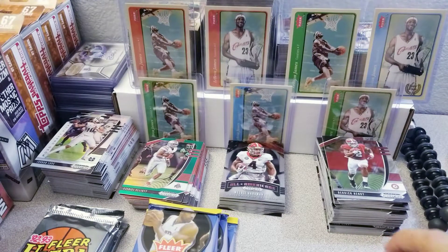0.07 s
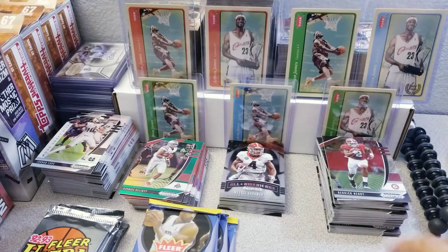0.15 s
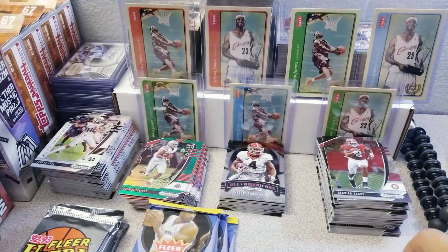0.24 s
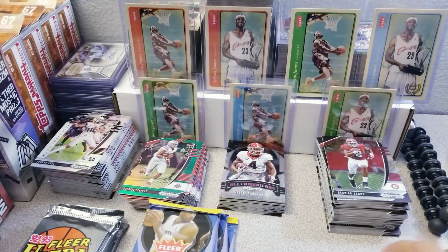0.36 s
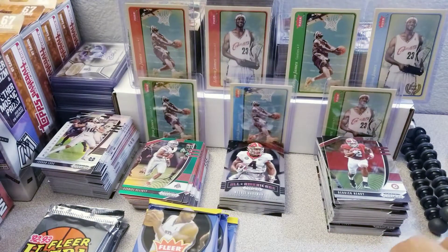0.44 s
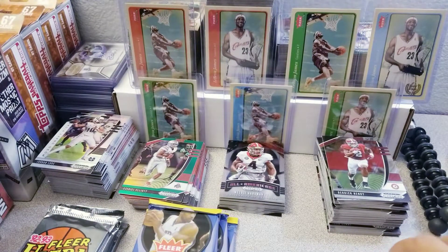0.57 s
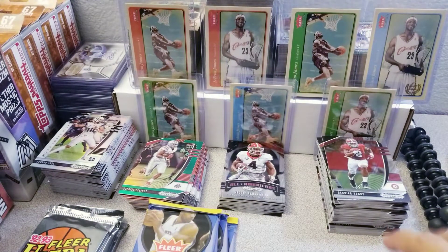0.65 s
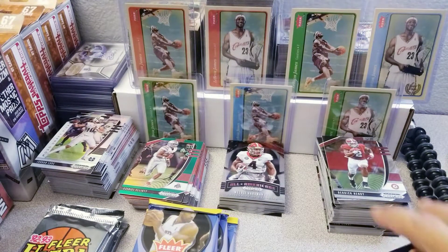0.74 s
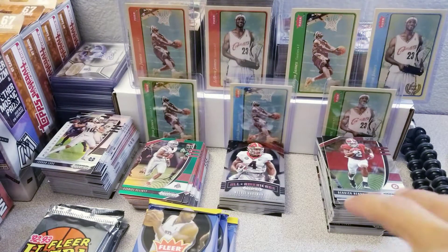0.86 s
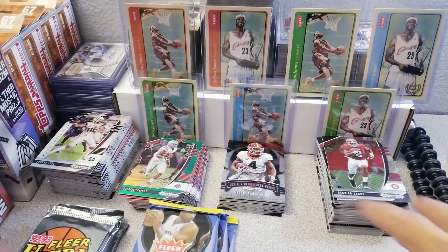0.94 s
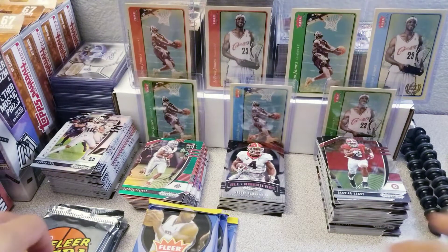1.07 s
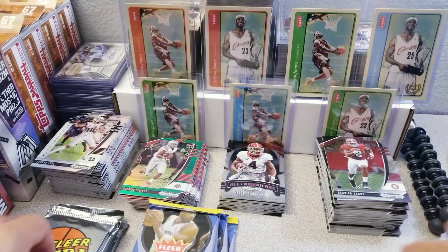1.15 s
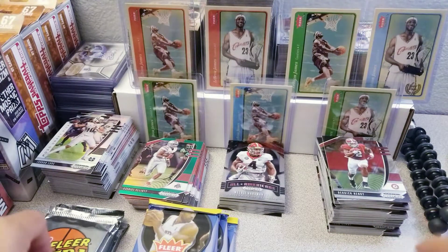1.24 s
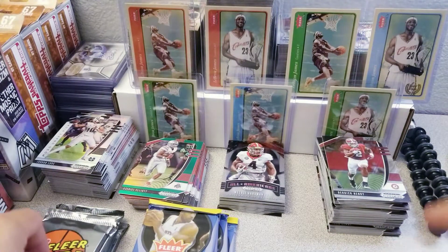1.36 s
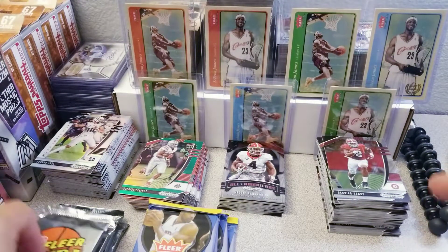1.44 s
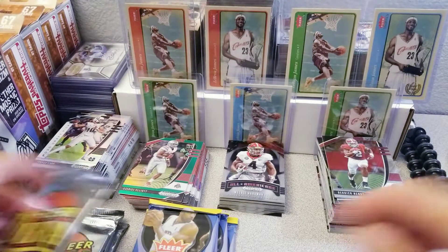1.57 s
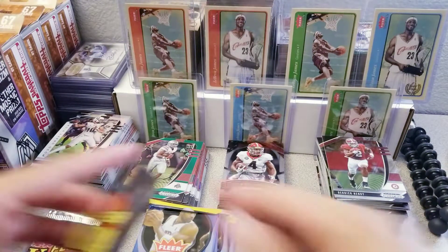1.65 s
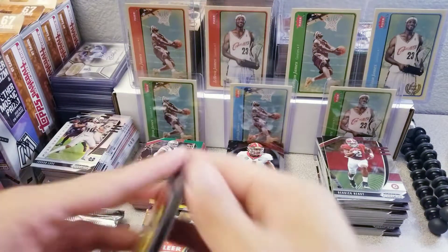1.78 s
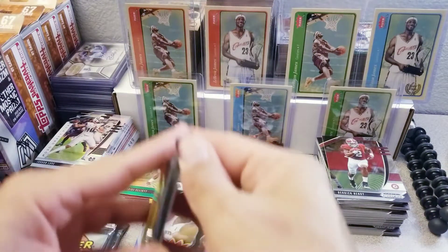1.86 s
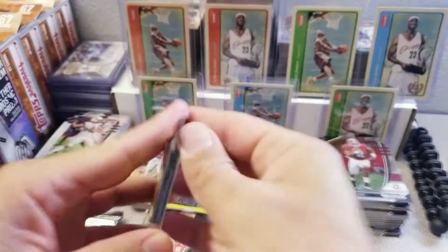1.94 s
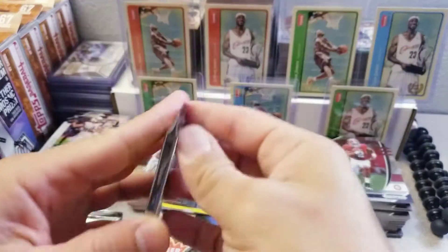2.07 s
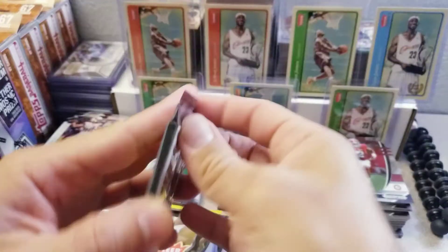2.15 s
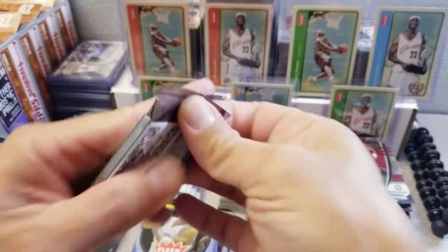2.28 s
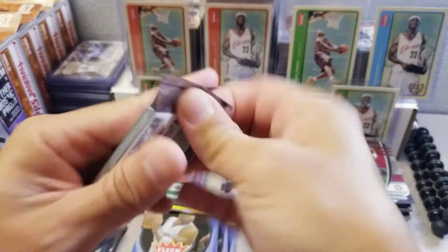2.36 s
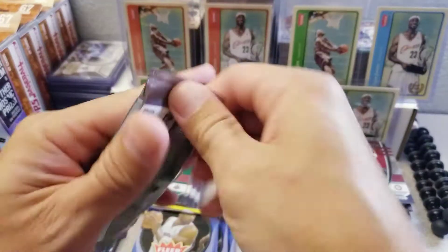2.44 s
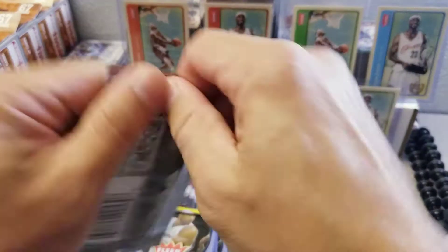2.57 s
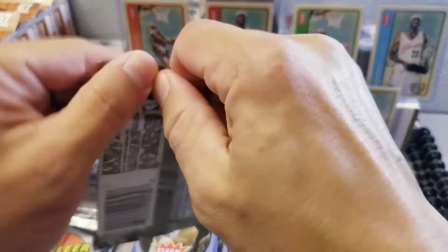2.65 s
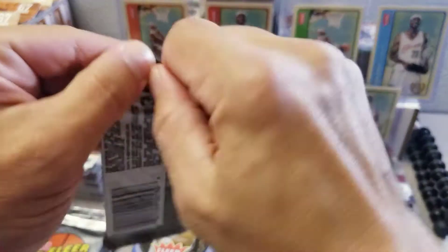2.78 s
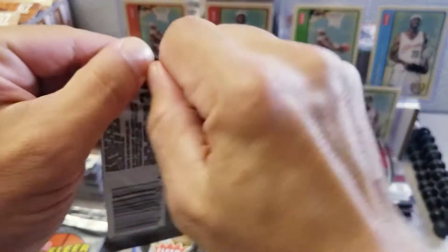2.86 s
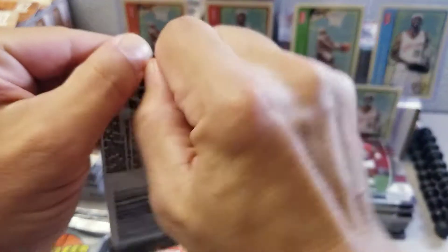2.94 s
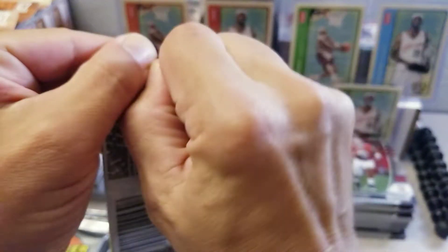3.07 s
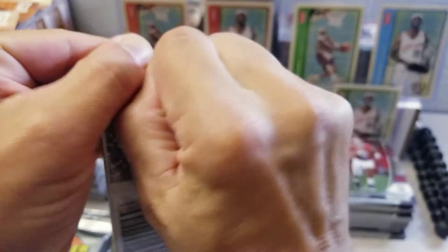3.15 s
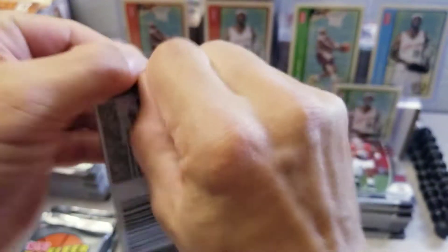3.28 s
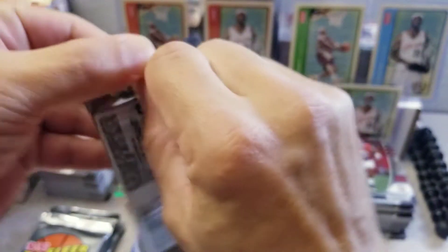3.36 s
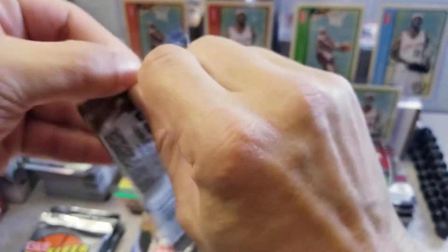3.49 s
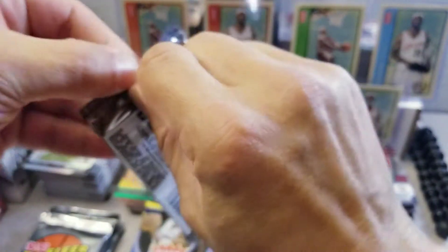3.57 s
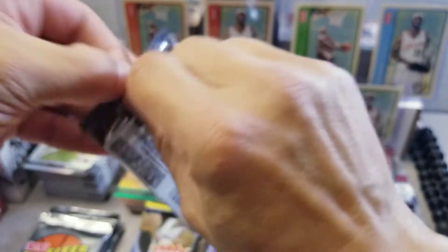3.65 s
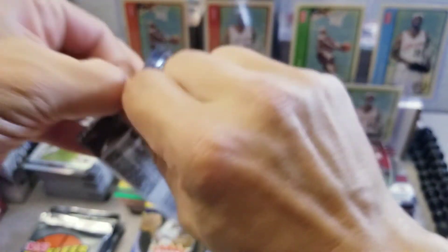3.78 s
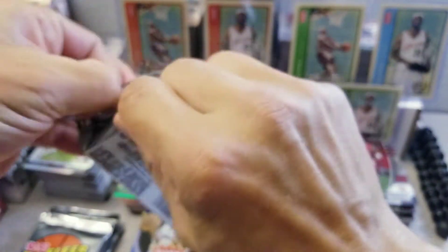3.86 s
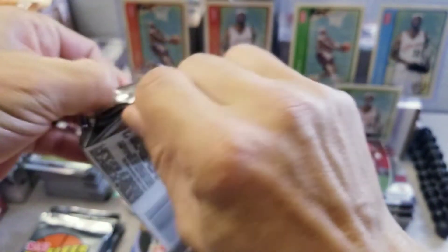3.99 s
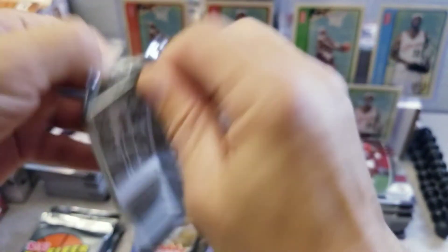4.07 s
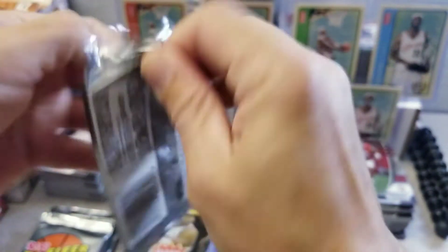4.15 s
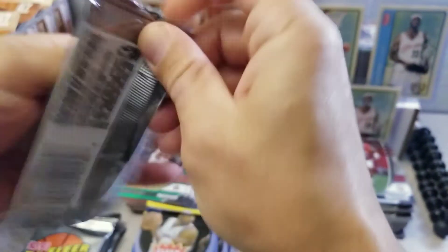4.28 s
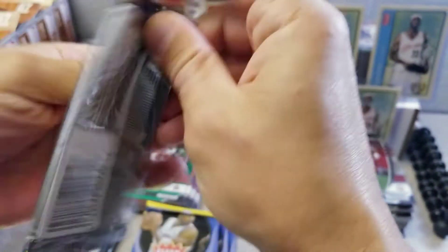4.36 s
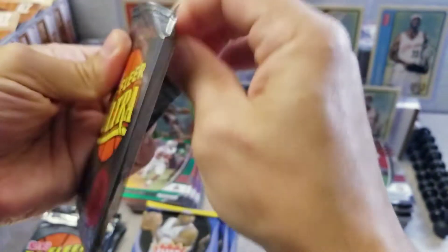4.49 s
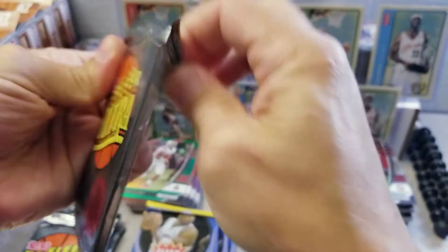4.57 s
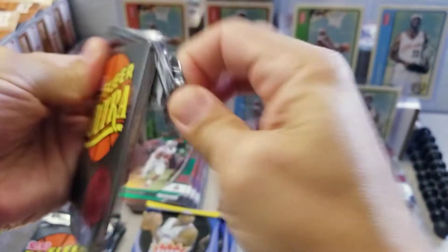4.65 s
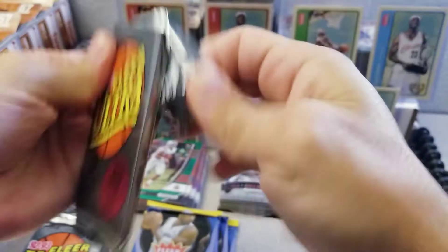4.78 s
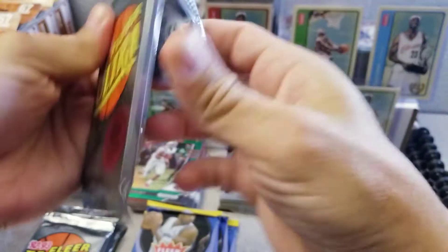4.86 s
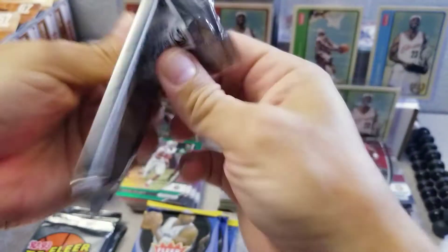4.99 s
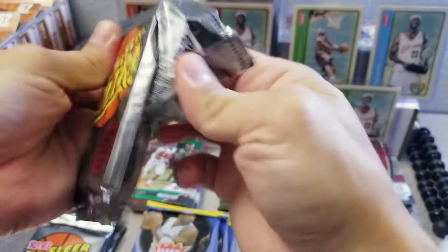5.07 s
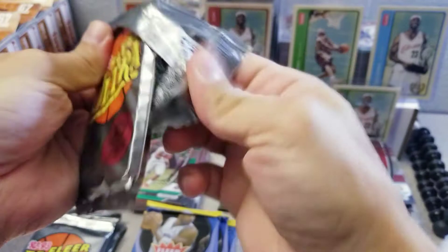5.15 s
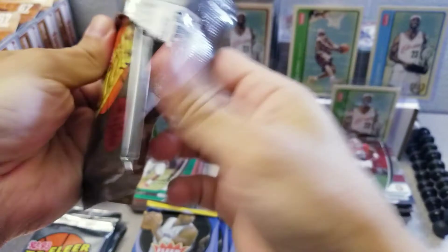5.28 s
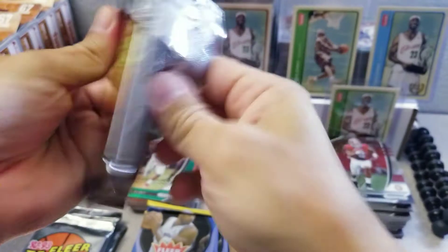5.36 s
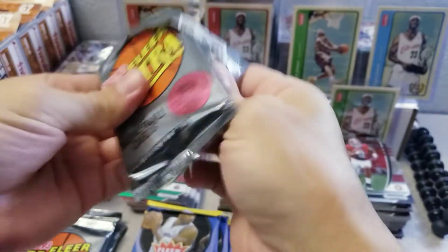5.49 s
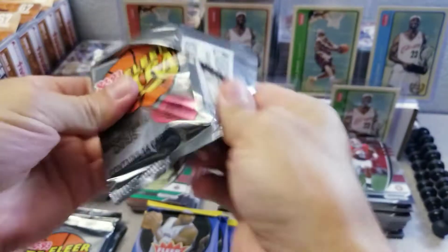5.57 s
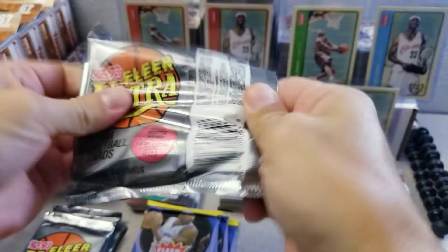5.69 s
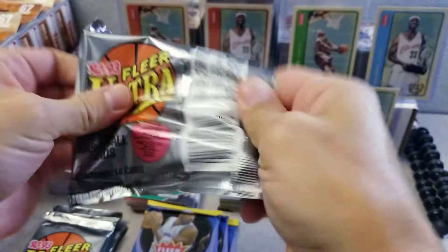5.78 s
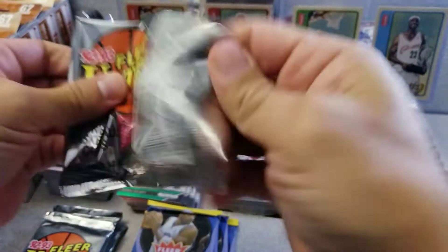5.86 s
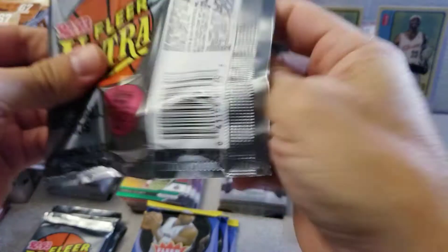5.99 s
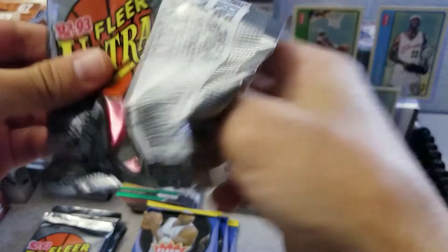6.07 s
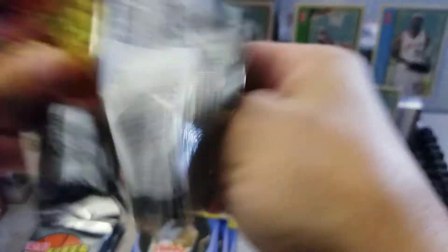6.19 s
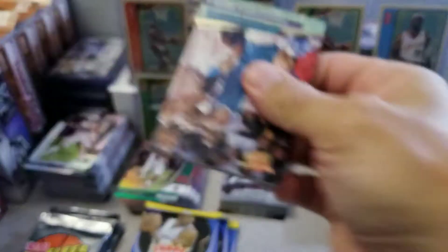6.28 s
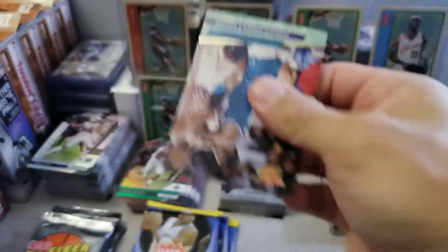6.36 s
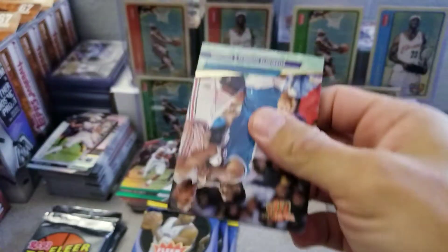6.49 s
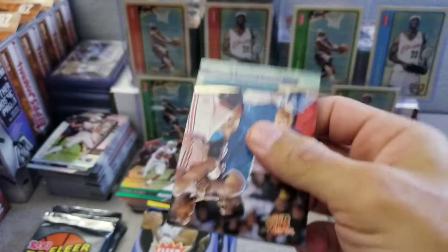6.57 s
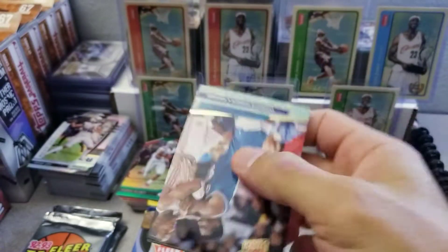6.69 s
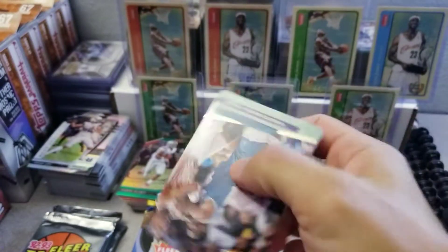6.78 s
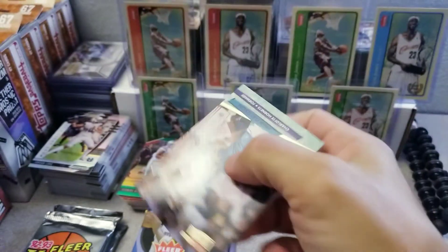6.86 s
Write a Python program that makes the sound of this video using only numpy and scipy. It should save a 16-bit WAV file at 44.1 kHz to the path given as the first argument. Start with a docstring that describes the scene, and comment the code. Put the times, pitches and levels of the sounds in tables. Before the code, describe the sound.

Near-silent hum, a tiny squeak, then bright foil crinkles and snaps build to a ripping seam and a papery card slide.

```python
"""Close to the microphone in a small, humming room, two hands pick up a foil pack of trading cards.
It starts with faint crackle from many tiny buckling wrinkles; the pack slides off its pile with a squeak and whistle.
Then creases snap one by one, each a spike with a short ring, over crackle that follows the flexing of the foil.
Late on the seam peels in a burst of friction and quick slips, and the air in the open pouch rings hollow.
At the end the cards slide against each other as filtered noise. Soft finger knocks are scattered throughout."""
import sys
import numpy as np
from scipy import signal
from scipy.fft import rfft, irfft, next_fast_len
from scipy.io import wavfile
from scipy.ndimage import uniform_filter1d, map_coordinates

SR = 44100
rng = np.random.default_rng(int(sys.argv[2]) if len(sys.argv) > 2 else 0)


def transcribe(signal):
    """Save signal, clipped to [-1, 1], as a 16-bit WAV file at the path in sys.argv[1]."""
    frames = np.atleast_2d(signal).T
    limited = np.clip(frames, -1, 1)
    pcm = np.round(limited * 32767).astype(np.int16)
    wavfile.write(sys.argv[1], SR, pcm)


N = 305613   # length in samples
TIME = np.arange(N) / SR   # seconds


def from_db(db):
    """Turn decibels into a gain."""
    return 10 ** (np.asarray(db) / 20)


def rms_one(x):
    """Scale a sound to an rms (average strength) of one."""
    return x / np.sqrt(np.mean(x ** 2) + 1e-20)


def in_time(rows):
    """Draw straight lines between the rows: each column of a curve, at every sample."""
    s, *columns = np.transpose(rows)
    return [np.interp(TIME, s, column) for column in columns]


def at_hz(points, hz):
    """Read a spectrum between its points on a log-frequency axis."""
    f, value = np.transpose(points)
    return np.interp(np.log(hz + 1), np.log(f), value)


def colour(x, points):
    """Give a sound a smooth spectrum by scaling its frequencies."""
    size = next_fast_len(N + SR // 10)
    hz = np.arange(size // 2 + 1) * SR / size
    return irfft(rfft(x, size) * from_db(at_hz(points, hz)), size)[..., :N]


def band(x, low_hz, high_hz, order=3):
    """Keep only the pitches between two edges."""
    edges = [low_hz, min(high_hz, .45 * SR)]
    return signal.sosfilt(signal.butter(order, edges, "band", fs=SR, output="sos"), x + 1e-18)


def resonate(x, modes):
    """Ring a body at several pitches side by side; a narrower resonance rings longer."""
    out = 0
    for hz, width_hz, db in modes:
        r = np.exp(-np.pi * width_hz / SR)
        poles = [1, -2 * r * np.cos(2 * np.pi * hz / SR), r * r]
        out = out + from_db(db) * signal.lfilter([1 - r, 0, r - 1], poles, x)
    return out


def pair(likeness, size=N):
    """Left and right noise; likeness is the share of power they have in common, 0 to 1."""
    common, left, right = rng.standard_normal((3, size))
    share = np.clip(likeness, 0, 1)
    return np.sqrt(share) * common + np.sqrt(1 - share) * np.array([left, right])


def stick_slip(curve, overtones_db, jitter):
    """A surface catches and slips at an unsteady rate, which makes a wavering tone with overtones."""
    hz, level_db = in_time(curve)
    wobble = rms_one(band(rng.standard_normal(N), 30, 550, order=1))
    phase = 2 * np.pi * np.cumsum(hz * (1 + jitter * wobble)) / SR
    tone = sum(from_db(db) * np.sin((k + 1) * phase) for k, db in enumerate(overtones_db))
    sounding = (TIME > curve[0][0]) * (TIME < curve[-1][0])
    return rms_one(tone) * from_db(level_db) * sounding


def rubbing(curve, modes, likeness):
    """Friction is noise that sounds the resonances of the body being rubbed."""
    return from_db(in_time(curve)[0]) * rms_one(resonate(pair(likeness), modes))


# Overall colour of the foil sheet. Each row: pitch in Hz, gain in dB.
FOIL_COLOUR = [(200, 6), (380, -7), (800, -6), (1300, -6), (2400, 1), (4100, 0.5), (5500, 3.5), (8000, 1.5),
               (11500, 5), (15500, -2.5)]
# Where the pack is held. Each row: time in seconds, average delay of the left ear in seconds.
PLACE = [(0, .00013), (3.7, .00003), (5.3, .00008), (5.9, .00005), (6.2, -.00006)]
# A small, tightly pinched patch of foil has little bass; a loose sheet has all of it.
# Each row: time in seconds, bass gain in dB.
SLACK = [(0, -0.5), (1.9, -9), (2.35, -1), (2.5, -8.5), (3.6, -7), (3.8, -16), (4.1, -5), (6.9, 1.5)]
# Air in the pouch rings. Each row: pitch in Hz, width in Hz, gain in dB before any overall pouch gain.
POUCH = [(355, 150, 8), (548.4, 10, 13), (628, 10, 11), (1616, 27, 5.5), (3510, 230, 1.5)]
# The sheet rings on a little. Each row: pitch in Hz, width in Hz, gain in dB.
SHEET_MODES = [(3356, 47, -5), (3963, 80, -2), (4550, 42, -15.5)]


def foil(scatter_s=.00004, creases_per_s=60, pouch_db=-13.0, low_cut_hz=265, bass_edge_hz=800):
    """Snaps and crackle ring in sheet and pouch, from all over the sheet, so the ear delay jumps about."""
    sheet = crackle() + sum(snaps(k) for k in range(len(REGISTERS)))
    sheet = band(colour(sheet, FOIL_COLOUR), low_cut_hz, SR / 2, order=2)
    bass = signal.sosfiltfilt(signal.butter(3, bass_edge_hz, fs=SR, output="sos"), sheet)
    sheet = sheet + (from_db(in_time(SLACK)[0]) - 1) * bass
    hollow = from_db(pouch_db) * resonate(sheet, POUCH)
    left, right = sheet + hollow + resonate(sheet, SHEET_MODES)
    # A new random spot on the sheet is used for each step, smoothed into the next.
    spot = rng.standard_normal(N)[(TIME * creases_per_s).astype(int)]
    delay_s = in_time(PLACE)[0] + scatter_s * uniform_filter1d(spot, size=200)
    left = map_coordinates(left, [np.arange(N) - delay_s * SR], order=5)
    return np.array([left, right * from_db(0.2)])


# Creases snapping through. Each row: time in seconds, crack level in dB before trim and foil filters,
# body and sizzle in dB relative to the crack, ring pitch of the facet in Hz, left over right in dB.
SNAPS = [(1.109, -48.5, -20, -16, 2400, 4), (1.6982, -34.5, -17, 7.5, 1900, -1),
         (1.711, -36.5, -9, 0, 1850, 0), (1.769, -39, -12, -0.5, 1850, -1),
         (1.907, -33, -13.5, 8.5, 3300, 0.5), (1.9391, -26, -20, -3.5, 1810, 1.5),
         (1.949, -28.5, -8.5, 1, 4820, 1.5), (2.077, -42, -34, 2.5, 4050, -5),
         (2.136, -31, -32, 7, 4600, 1), (2.1782, -22, -28, -7.5, 4110, -9),
         (2.2753, -25.5, -16, -6.5, 1360, -1), (2.3574, -29, -12, -2, 3700, -1),
         (2.435, -48, -20, 12, 4690, -1), (2.46, -26.5, -24, 0, 3530, -1),
         (2.5321, -28.5, -14, -5, 3900, 1), (2.551, -31, -4.5, -2, 1320, -1.5),
         (2.606, -37, -15, 10.5, 4950, -3), (2.629, -32, -22, 2.5, 3900, 4),
         (2.634, -32.5, -27, 3.5, 4500, -4), (2.7028, -39, -23, 6, 2430, 0),
         (2.763, -35, -20, -10, 3980, 3), (2.7146, -25, -38, -1, 4110, 0),
         (2.7497, -37.5, -10, 13, 4130, -6), (2.8003, -18.5, -22.5, -3.5, 4400, -1.5),
         (2.8766, -31, -38, 0.5, 4230, -1), (2.893, -35, -3, -6, 1280, 1),
         (2.9032, -34.5, -18, 4, 2560, -2), (2.992, -51, -29, 17, 4480, -2),
         (3.118, -55, -11, 18, 4800, 0.5), (3.2149, -44, -38, 14.5, 4070, -1),
         (3.245, -36, -12.5, 0.5, 4070, 0.5), (3.304, -25.5, -24, -2.5, 2330, -1),
         (3.353, -48.5, -29.5, 17, 2240, 1.5), (3.428, -36, -28, -10, 2330, -3.5),
         (3.4734, -42, -26, -5, 3360, 3), (3.6385, -41, -35.5, 4.5, 3380, -1),
         (3.79, -29.5, -9, 13.5, 4590, 3), (3.8296, -29, -4.5, 12, 3940, -2),
         (3.9325, -25.5, -15.5, 0, 3940, 0.5), (4.0399, -23.5, -20, -5, 4160, -2),
         (4.071, -27.5, -23.5, 5, 4070, -3), (4.085, -27.5, -12, -3, 4090, -1),
         (4.1051, -26.5, -23.5, -2, 4050, 1), (4.1132, -32, -8, 2, 1160, -3.5),
         (4.1675, -32, -13, -13, 2370, -2), (4.2542, -16, -15.5, -2.5, 2920, 2),
         (4.3184, -34.5, -3, 3.5, 1110, 0.5), (4.376, -35, -5, -2, 3450, -3),
         (4.3843, -29, -24, 7.5, 2400, -3.5), (4.3927, -24.5, -15, -5, 3880, -0.5),
         (4.4231, -27, -6.5, 3.5, 1520, -3.5), (4.4305, -26.5, -17, -8.5, 3340, 1.5),
         (4.4373, -27, -18, -12.5, 3900, -1), (4.4938, -22.5, -16.5, 5, 2890, -4.5),
         (4.5202, -15.5, -19.5, -11.5, 3320, 0.5), (4.5283, -19, -20.5, -12.5, 2390, -0.5),
         (4.5765, -19, -16, -12.5, 3820, 1), (4.7529, -29.5, -11, -3, 1570, -0.5),
         (4.7854, -29, -10.5, -21.5, 4330, 0.5), (4.8012, -28.5, -12, -4.5, 3700, 0),
         (4.886, -30.5, -27.5, -5.5, 3420, -1), (5.027, -24.5, -8, 5, 3900, -1),
         (5.0876, -22.5, 0.5, 12.5, 2350, 1), (5.156, -32, -14, 6, 2300, 1),
         (5.1775, -22, -23, 1, 1100, -1), (5.1977, -30, -16.5, -0.5, 1210, -0.5),
         (5.2618, -27.5, -16.5, 6.5, 4460, -3.5), (5.2975, -21.5, -37.5, -2.5, 3420, -1),
         (5.4121, -30, -4, -11.5, 1850, -1), (5.477, -35, -12, 8.5, 3320, 0),
         (5.4953, -34.5, -10.5, 9.5, 4390, -1), (5.542, -35.5, -14, 9, 3960, -5),
         (5.562, -30, -1.5, 2, 1230, 0), (5.5734, -27, -23, 10, 3360, -2.5),
         (5.5952, -25.5, -0.5, 5.5, 1770, 1), (5.673, -20.5, -8, -5, 1990, -3.5),
         (5.7496, -25.5, -8.5, -5.5, 3420, -1), (5.952, -31.5, -10.5, -2.5, 3980, 3.5),
         (5.962, -33.5, -14, 1.5, 4070, -4), (6.0588, -25, -10.5, 0.5, 3640, 4),
         (6.1789, -36.5, -29, 5.5, 4890, -2), (6.246, -45.5, -13, 7, 2370, 3),
         (6.283, -37, -10.5, 7, 4520, 16), (6.3023, -40, -5.5, 6, 3210, 6), (6.45, -40, -34, 4, 4610, 3)]
# The foil's three registers: body, crack and sizzle. Each row: lowest Hz, highest Hz,
# typical decay in seconds, left-right likeness from 0 to 1, snap trim in dB, crackle trim in dB.
REGISTERS = [(270, 1405, 0.0005, 0.94, 3.5, 3), (1120, 5440, 0.0016, 0.55, -2, -0.5),
             (4890, 15030, 0.0017, 0.79, -1.5, -3.5)]
FACET_HZ = 3860   # pitch of a typical facet


def snaps(register, flutter_db=-23, flutter_s=0.011, stiffness_spread=.2, spike_share=1.4, spike_s=0.000092,
          facet_width_hz=560, facet_db=6, facet_fall_db=-7, lead_s=.002, lead_db=-17):
    """Each crease gives a little, spikes, rings at its facet's pitch and flutters; low facets ring more."""
    low_hz, high_hz, decay_s, likeness, trim_db, _ = REGISTERS[register]
    t = np.arange(SR // 30) / SR - lead_s
    after = np.maximum(t, 0)
    # Stiff creases ring longer.
    ring_s = decay_s * np.exp(stiffness_spread * rng.standard_normal((len(SNAPS), 1, 1)))
    ring = np.exp(-after / ring_s)
    flutter = from_db(flutter_db) * np.exp(-after / flutter_s)
    spike = spike_share * np.exp(-after / spike_s)
    shape = np.where(t < 0, from_db(lead_db), ring + flutter + spike)
    noise = np.array([pair(likeness, size=len(t)) for row in SNAPS])
    bursts = band(noise * shape, low_hz, high_hz)
    out = np.zeros((2, N + len(t)))
    for (s, db, body_db, sizzle_db, ring_hz, pan_db), burst in zip(SNAPS, bursts):
        level_db = db + (body_db, 0, sizzle_db)[register] + trim_db
        facet_gain_db = facet_db + facet_fall_db * np.log2(ring_hz / FACET_HZ)   # fall per octave
        burst = burst + resonate(burst, [(ring_hz, facet_width_hz, facet_gain_db)])
        strength = np.sqrt(np.sum(burst ** 2, axis=1, keepdims=True) / (.004 * SR))   # as if spread over 4 ms
        ears = rms_one(from_db(np.array([[pan_db], [-pan_db]]) / 2))
        at = int((s - lead_s) * SR)
        out[:, at:at + len(t)] += burst / strength * ears * from_db(level_db)
    return out[:, :N]


def crackle(per_s=380, typical_flex_db=-35, crowding=.95, spread_db=4.0, even_s=0.045, colour_db=4.5,
            pan_db=1.0, rub_share=.1, soft_db=-57, count=4):
    """Tiny wrinkles buckle at random and crowd together in a hard pull; a light touch mostly rubs."""
    levels = flexing()
    chance = per_s * from_db(crowding * (levels[1] - typical_flex_db)) / SR
    born = np.flatnonzero(rng.random(N) < chance)
    size_db = spread_db * np.minimum(rng.exponential(1, len(born)), 3.5)
    # Each wrinkle has its own side.
    size_db = size_db + pan_db * rng.standard_normal(len(born)) * np.array([[1], [-1]])
    rub = rub_share + from_db(soft_db - np.max(levels, axis=0))
    out = 0
    for (low_hz, high_hz, decay_s, likeness, _, trim_db), level_db in zip(REGISTERS, levels):
        edges = np.geomspace(low_hz, high_hz, count + 1)
        for lo, hi in zip(edges, edges[1:]):
            # A random size in each narrow band gives each wrinkle its own colour.
            kicks = np.zeros((2, N))
            kicks[:, born] = from_db(size_db + colour_db * rng.standard_normal(len(born))) ** 2
            energy = signal.lfilter([1], [1, -np.exp(-2 / (decay_s * SR))], kicks + 1e-9)
            # The hands set how much energy is released, so the slow average is evened out.
            energy /= uniform_filter1d(energy.mean(axis=0), int(even_s * SR)) + 1e-6
            grains = band(pair(likeness) * np.sqrt((energy + rub) / (1 + rub)), lo, hi, order=2)
            out = out + from_db(level_db + trim_db) * rms_one(grains) * np.sqrt(hi / high_hz / count)
    return out


# Fingers flex or tear the foil. Each row: start in seconds, length in seconds,
# crack level in dB before trim and foil filters, body in dB relative to that.
FLEXES = [(0.098, 0.029, -54.5, -12), (0.311, 0.05, -62, -21), (1.099, 0.048, -67, 7),
          (1.69, 0.019, -39, -12), (1.932, 0.021, -42, -5.5), (2.162, 0.032, -27, -16.5),
          (2.336, 0.023, -40.5, -7.5), (2.785, 0.0099, -33, -20), (2.885, 0.028, -44, -29),
          (3.074, .08, -66, 5.5), (3.746, .025, -29, -23), (3.771, 0.038, -22, -14.5),
          (3.803, 0.023, -33, 0.5), (4.025, .012, -37, -4), (4.099, .015, -33, 2.5),
          (4.154, 0.08, -40.5, -5), (4.427, 0.024, -45, -12.5), (4.498, 0.056, -29, -16.5),
          (4.566, 0.032, -27, -5.5), (4.741, 0.016, -34, 2), (4.772, 0.062, -40, -8.5),
          (4.925, 0.072, -37, -4), (4.979, 0.025, -26.5, -10.5), (5.031, 0.052, -27, -9),
          (5.148, 0.051, -37, -2.5), (5.31, 0.092, -38, -8), (5.407, .14, -31, -10),
          (5.573, 0.03, -24.5, -4.5), (5.649, 0.057, -42.5, -11), (5.779, 0.042, -34.5, -5),
          (6.009, 0.02, -38, -10), (6.096, 0.049, -38.5, -7), (6.149, 0.028, -33.5, -9.5),
          (6.285, 0.048, -49, -25)]
# Faint crackle under the holding fingers. Each row: time in seconds,
# crack level in dB before trim and foil filters, body in dB relative to that.
GRIP = [(0, -67.5, -14), (0.45, -70, -14), (0.6, -81, -8.5), (1.66, -76, -8), (1.9, -57.5, -7),
        (2.3, -51, -8.5), (2.85, -55, -12), (3.08, -63.5, -3.5), (3.42, -61, -7.5), (3.59, -74.5, -6.5),
        (3.68, -57.5, -15.5), (4.15, -48, -4), (4.48, -50, 4.5), (4.71, -52, -9.5), (4.95, -42, -4.5),
        (5.7, -52.5, -6), (5.88, -47.5, -7.5), (6.2, -55, -14.5), (6.7, -78.5, -16)]


def flexing(attack_s=0.0035, release_s=0.015, grip_sizzle_db=4.5, flex_sizzle_db=2):
    """Body, crack and sizzle levels in dB: each flex rises, holds and dies away over the steady grip."""
    grip_db, body_db = in_time(GRIP)
    power = from_db([grip_db + body_db, grip_db, grip_db + grip_sizzle_db]) ** 2
    for s, length_s, db, body_db in FLEXES:
        span = slice(int(max(s - .05, 0) * SR), int((s + length_s + .2) * SR))
        t = TIME[span] - s
        rise = np.clip(t / attack_s + .5, 0, 1)
        fall = np.exp(-np.maximum(t - length_s, 0) / release_s)
        flex = from_db([[db + body_db], [db], [db + flex_sizzle_db]]) * rise * fall
        power[:, span] += flex ** 2
    return 10 * np.log10(power)


# The seam peels apart and shakes the open pouch. Each row: time in seconds, level in dB.
PEEL = [(5.57, -83.5), (5.585, -39), (5.605, -28.5), (5.625, -36.5), (5.66, -51), (5.70, -41.5), (5.8, -75)]
# The glue lets go in quick slips. Each row: time in seconds, slips per second, level in dB.
ZIP = [(5.568, 1560, -70), (5.575, 1800, -32), (5.598, 1100, -44), (5.62, 1600, -89)]


def seam():
    """Peeling friction rings the air in the pouch while the glue slips in a fast buzz."""
    return rubbing(PEEL, POUCH, likeness=0.73) + stick_slip(ZIP, [-4, 0, -10], jitter=0.022)


# The pack's smooth face slides off its pile. Each row: time in seconds, level in dB before filtering.
PICKUP = [(1.15, -110), (1.3, -83), (1.6, -67), (1.67, -66), (1.75, -110)]
# Resonances of the pack. Each row: pitch in Hz, width in Hz, gain in dB.
PACK = [(1800, 510, -2), (3300, 1300, 1), (7000, 3500, -2)]
# Card slides on card. Each row: time in seconds, level in dB before filtering.
SLIDE = [(6.2, -110), (6.36, -56.5), (6.68, -66), (6.822, -72), (6.832, -51.5), (6.86, -59), (6.93, -63)]
# Resonances of the cards. Each row: pitch in Hz, width in Hz, gain in dB.
CARD = [(1535, 65, 10), (1940, 430, 9.5), (2730, 470, 12), (3420, 380, 14.5), (4400, 150, 9.5)]
# The foil's edge whispers off the last card. Each row: time in seconds, level in dB before filtering.
EDGE = [(6.44, -110), (6.455, -37.5), (6.5, -61), (6.6, -69), (6.75, -110)]


def sliding():
    """Smooth things rub: the pack on its pile, card on card, the foil's edge on the last card."""
    pack = band(rubbing(PICKUP, PACK, likeness=0.27), 1500, 9000)
    cards = band(rubbing(SLIDE, CARD, likeness=0.23), 1250, 4800, order=5)
    edge = band(rubbing(EDGE, [(12100, 1900, 0)], likeness=0.27), 8000, 16130)
    return pack + cards + edge


# A short squeak as the hand reaches over the table. Each row: time in seconds, pitch in Hz, level in dB.
SQUEAK = [(1.088, 740, -61), (1.10, 800, -59), (1.118, 899, -59), (1.131, 864, -50), (1.143, 710, -63),
          (1.175, 594, -69)]
# The pack's edge whistles thinly as it is drawn off the pile.
# Each row: time in seconds, pitch in Hz, level in dB.
WHISTLE = [(1.33, 11100, -80), (1.38, 11400, -70), (1.5, 11750, -90)]
# A brief rising creak. Each row: time in seconds, pitch in Hz, level in dB.
CREAK = [(3.222, 1180, -79), (3.229, 1260, -51.5), (3.241, 1380, -58.5), (3.25, 1420, -78)]


def squeaks():
    """Surfaces catch and slip fast enough to be heard as unsteady tones."""
    squeak = stick_slip(SQUEAK, [0, -15], jitter=0.16)
    whistle = stick_slip(WHISTLE, [0], jitter=0.012)
    creak = stick_slip(CREAK, [0], jitter=0.04)
    return squeak + whistle + creak


# Soft knocks of fingers on the pack and table. Each row: time in seconds, level in dB before filtering.
KNOCKS = [(0.212, -48), (1.095, -51.5), (2.9, -48.5), (4.213, -46), (4.745, -45.5), (5.588, -37.5),
          (5.807, -43.5), (6.162, -40.5)]
# Ringing of a knock. Each row: typical pitch in Hz, gain in dB, time to fall by 60 dB in seconds.
KNOCK_MODES = [(134, 1.5, 0.12), (201, -5.5, 0.081), (300, -19.5, 0.05)]


def knocks():
    """Fingers bump the stiff stack, which gives a short dull ring."""
    out, t = np.zeros(N + SR), np.arange(SR // 5) / SR
    for s, level_db in KNOCKS:
        at = int(s * SR)
        for hz, db, t60 in KNOCK_MODES:
            ring = np.sin(2 * np.pi * hz * rng.uniform(0.78, 1.19) * t)
            out[at:at + len(t)] += from_db(level_db + db - 60 * t / t60) * ring
    return band(out[:N], 115, 520, order=2)


# How long the room rings. Each row: pitch in Hz, time to fall by 60 dB in seconds.
ROOM_T60 = [(200, 0.13), (1000, 0.58), (4000, 0.51), (14000, 0.32)]


def room(x, wet_db=-11.0, build_s=0.0027, alike_hz=1100):
    """A diffuse tail dies at its own rate in each band; long waves reach both ears alike."""
    t = np.arange(SR * 2 // 3) / SR
    edges = np.geomspace(140, 18000, 8)
    tail = 0
    for lo, hi in zip(edges, edges[1:]):
        noise = pair(1 / (1 + (hi / alike_hz) ** 2), size=len(t))
        decay_db = -60 * t / at_hz(ROOM_T60, np.sqrt(lo * hi))
        tail = tail + band(noise, lo, hi, order=2) * from_db(decay_db)
    tail = tail * (1 - np.exp(-t / build_s))
    tail = rms_one(tail) / np.sqrt(len(t))   # unit energy
    return from_db(wet_db) * signal.fftconvolve(x, tail, axes=1)[:, :N]


# Loudness of the hum over time. Each row: time in seconds, level in dB before the hum's overall gain.
HUM = [(0.0, -61), (1.91, -61), (2.26, -49.5), (5.46, -53.5), (6.93, -57)]
# Colour of the room tone. Each row: pitch in Hz, relative level in dB per Hz.
AIR = [(20, -44.5), (56, -3.5), (80, -20), (127, -5), (185, -13.5), (363, -27.5), (516, -47),
       (16000, -53.5)]


def background(hum_hz=120, hum_db=-6.5, motor_hz=70, motor_db=-71, drone_db=-68, air_db=-69):
    """Mains hum and a motor are sine tones; the motor's low drone and the room tone are noise."""
    hum = from_db(in_time(HUM)[0] + hum_db) * np.sin(2 * np.pi * hum_hz * TIME)
    motor = from_db(motor_db) * np.sin(2 * np.pi * motor_hz * TIME)
    drone = from_db(drone_db) * rms_one(band(pair(0.98), 77.0, 135.7))
    air = from_db(air_db) * rms_one(colour(pair(0.6), AIR))
    return np.sqrt(2) * (hum + motor) + drone + air   # root two makes the sine levels rms


def scene():
    """The pack and the cards sound in the room, over its background."""
    near = foil() + seam() + sliding() + squeaks() + knocks()
    return near + room(near) + background()


def record(dry, cutoff_hz=16200):
    """Peaks stop at full scale and the top is cut."""
    low_pass = signal.ellip(10, .1, 70, cutoff_hz, fs=SR, output="sos")
    return signal.sosfilt(low_pass, np.clip(dry, -1, 1))


dry = scene()
out = record(dry)
transcribe(out)
```